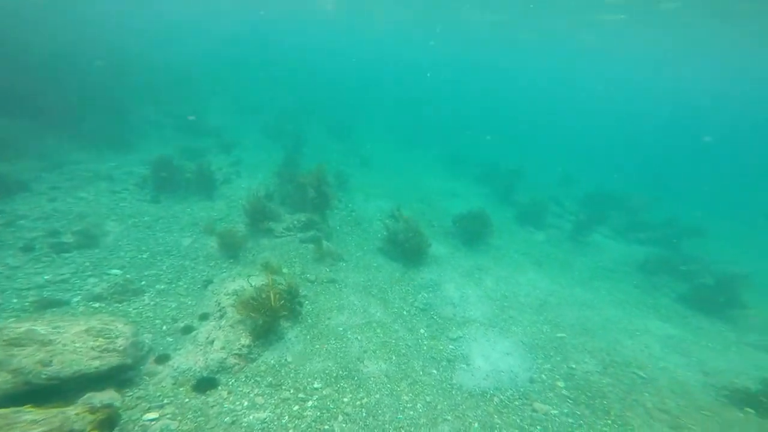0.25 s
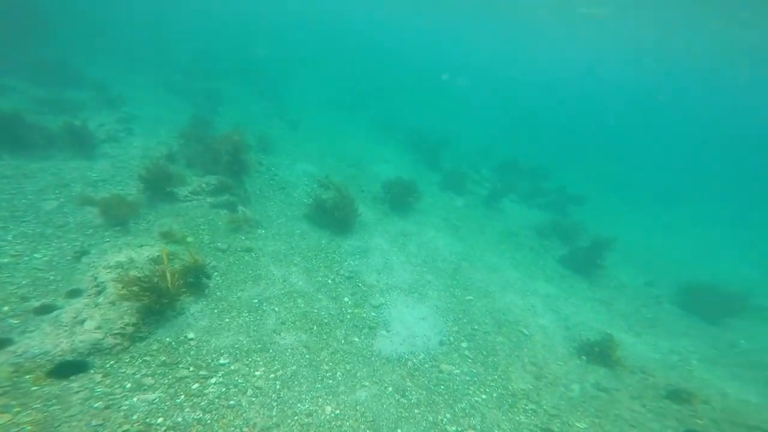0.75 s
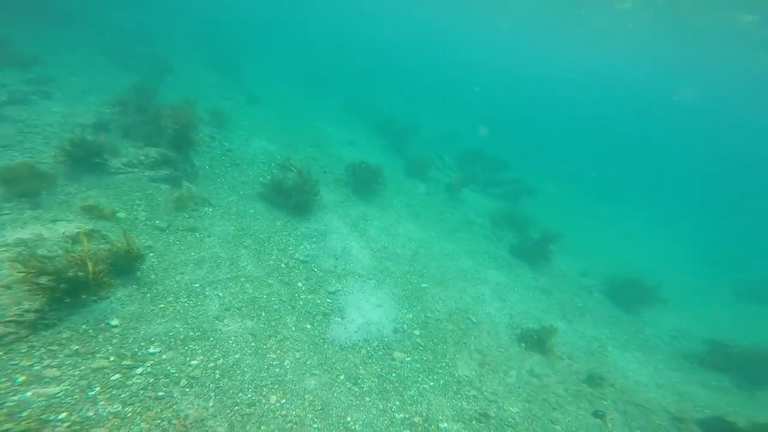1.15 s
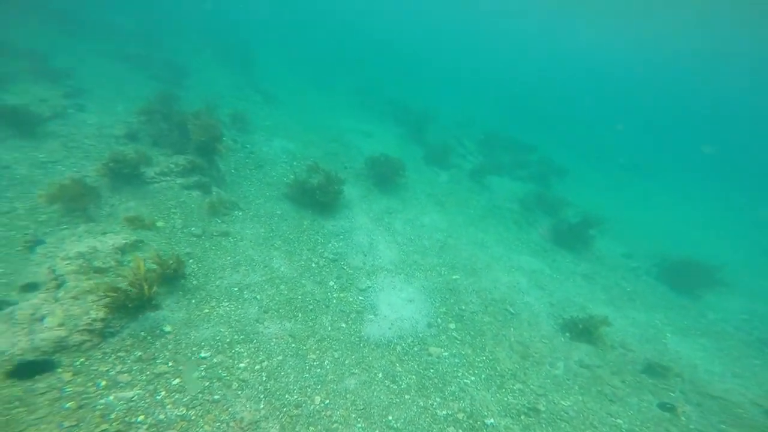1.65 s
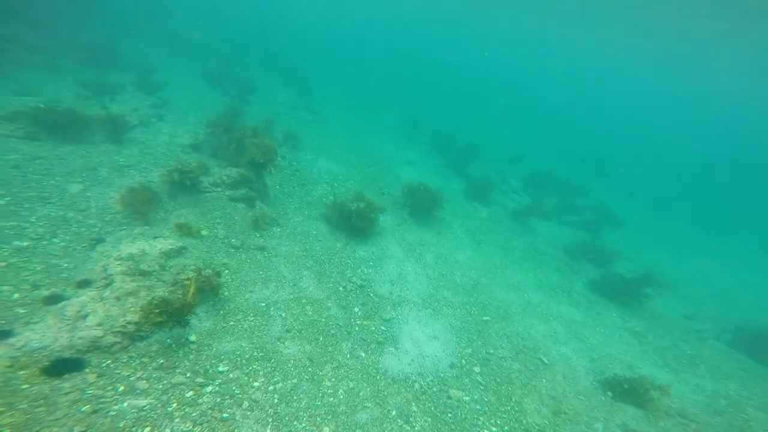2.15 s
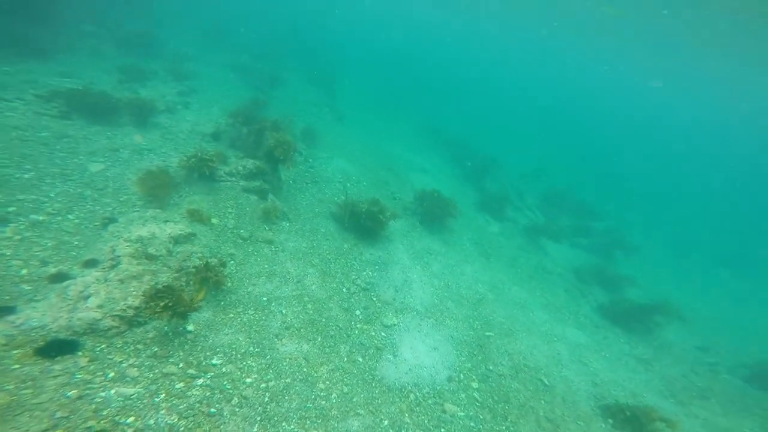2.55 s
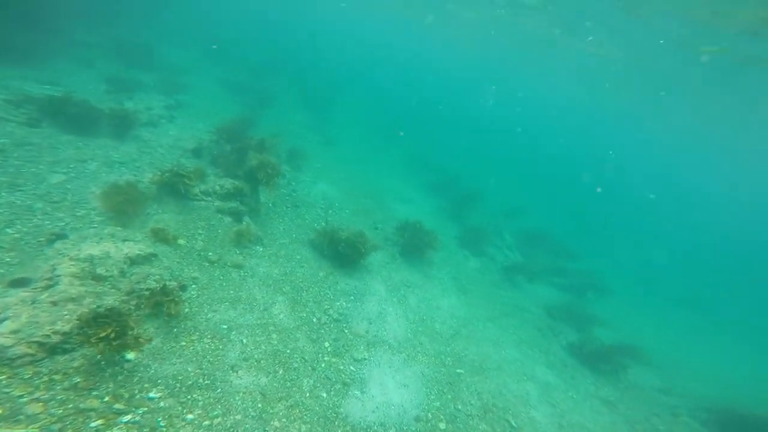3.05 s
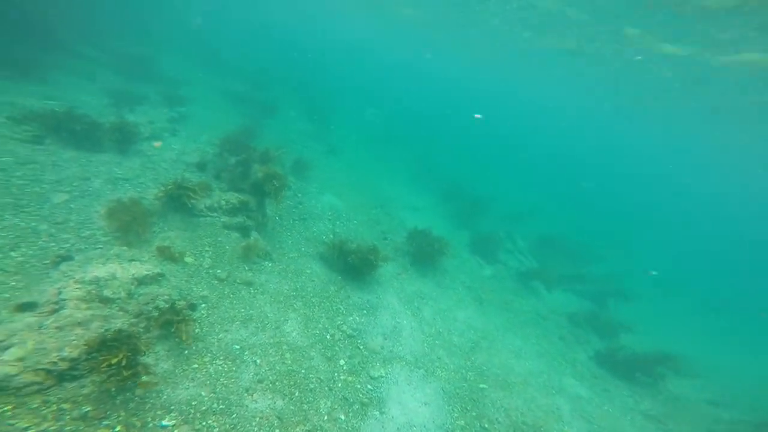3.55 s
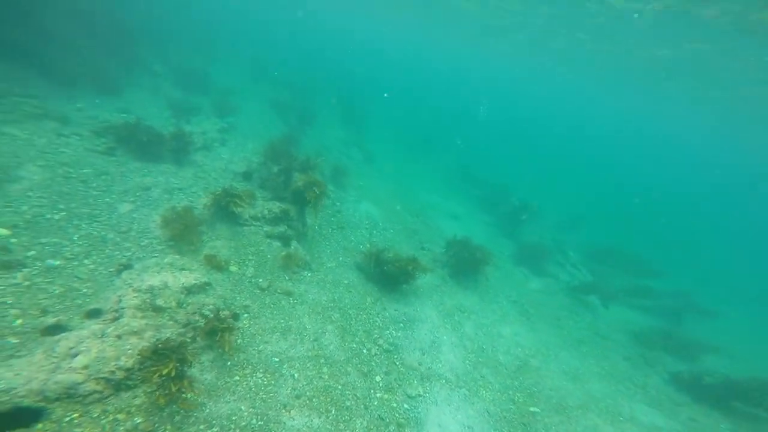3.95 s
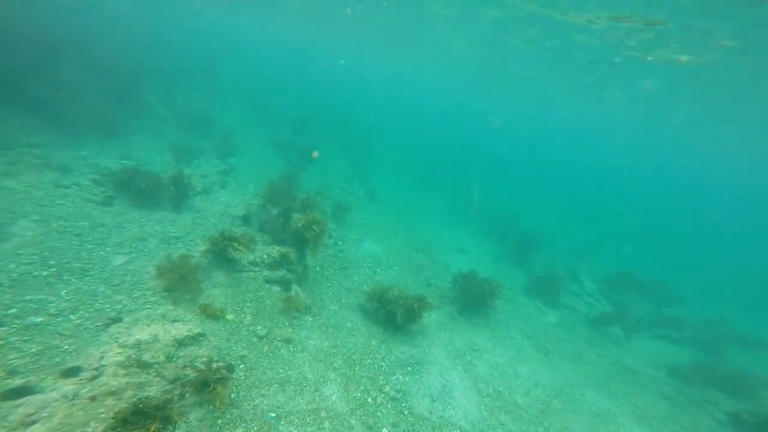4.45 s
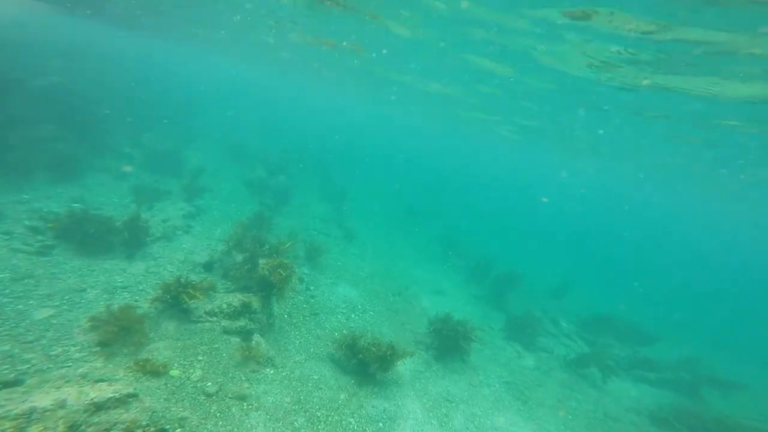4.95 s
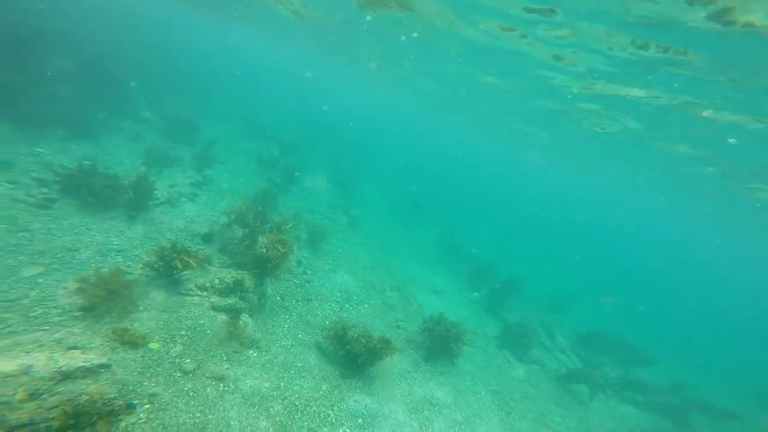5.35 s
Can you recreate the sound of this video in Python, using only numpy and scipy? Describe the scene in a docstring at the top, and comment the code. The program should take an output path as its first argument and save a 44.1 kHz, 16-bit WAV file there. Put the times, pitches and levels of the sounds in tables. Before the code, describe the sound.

A shallow seabed is heard from inside a sealed camera housing, muffled and boxy. Low surging rumble and dull water murmur waver throughout beneath distant crackle and tiny bubble fizz, with faint steady hiss and a very thin, rapidly fluttering high whine. Dry shrimp-like snaps come irregularly, several a second: strong ones at 0.05 and especially 0.25, a busy patch near 0.7, then sparser, weaker ticks. The wash and crackle swell around 1.7-2.2, with a hard snap at 1.8, then fall back by 2.3. Another sharp snap lands at 2.9. Soft low water thumps recur, as near 0.2, 1.6 and 4.2. Round hollow gulps cluster at 3.4-4.0, the clearest at 3.4. A blunt casing knock joins a loud snap at 4.07; a gulp, click and knock meet near 4.8, and snap and knock again at 5.4. Low surge rises at the end.

```python
"""Water murmurs and crackles on a sealed camera housing over faint hiss and whine, while shrimps snap
throughout. Water is coloured noise; far snaps and bubbles excite the wall's modes. Near snaps are a pulse plus
decaying scatter through those modes. Air pockets gulp as short sines, and a few low thumps hum the same way;
low lumps of water are brief sine pulses, and grit knocks as noise bursts in the low modes. The wall notches all
but the electronics."""
import sys
import numpy as np
from scipy import signal
from scipy.fft import rfft, irfft, next_fast_len
from scipy.io import wavfile
from scipy.ndimage import uniform_filter1d, map_coordinates

SR = 44100
rng = np.random.default_rng(int(sys.argv[2]) if len(sys.argv) > 2 else 0)


def store_pcm(level_fs):
    """Save levels as 16-bit WAV."""
    pcm = np.round(np.clip(level_fs, -1, 1) * 32767).astype(np.int16)
    wavfile.write(sys.argv[1], SR, np.atleast_2d(pcm).T)


N = 246959

# low housing resonances: centre_hz, width_hz, gain_db
HOLLOW_MODES = [(540, 95, 3.5), (676, 97, 7.5), (824, 80, -5), (930, 150, -3.5)]
# middle housing resonances: centre_hz, width_hz, gain_db
RING_MODES = [(1631, 64, 12.5), (1873, 150, 16), (2290, 405, 16), (3220, 1200, 12), (3870, 2700, 4),
              (4320, 360, -26)]
# upper housing resonances: centre_hz, width_hz, gain_db
TREBLE_MODES = [(5180, 2140, 7.5), (8500, 4400, 4)]


def amp(db):
    """Decibels to gain."""
    return 10 ** (np.asarray(db) / 20)


def unit(x):
    """Scaled to rms 1."""
    return x / np.sqrt(np.mean(x ** 2) + 1e-20)


def shape(points):
    """Gain curve through (Hz, dB) points on a log axis; -120 dB outside them."""
    point_hz, point_db = np.transpose(points)

    def gain(hz):
        return amp(np.interp(np.log(hz + 1), np.log(point_hz + 1), point_db, left=-120, right=-120))
    return gain


def peak(f, hz, width):
    """One causal resonance, gain 1 at its centre."""
    return 1j * f * width / (hz * hz - f * f + 1j * f * width)


def modes(table):
    """Resonances summed with like signs leave notches between; a window confines the group."""
    low_hz, high_hz = table[0][0], table[-1][0]
    centre_hz, width_hz = np.sqrt(low_hz * high_hz), 1.15 * high_hz - .85 * low_hz

    def response(f):
        total = sum(amp(db) * peak(f, hz, width) for hz, width, db in table)
        return peak(f, centre_hz, width_hz) ** 2 * total
    return response


def filtered(x, response):
    """x through a complex response of frequency."""
    n = x.shape[-1]
    m = next_fast_len(n + 8192)  # padding for the ringing
    spectrum = rfft(x, m) * response(np.fft.rfftfreq(m, 1 / SR))
    return irfft(spectrum, m)[..., :n]


def wobble(rate_hz):
    """A smooth random curve, rate_hz knots a second."""
    return map_coordinates(rng.standard_normal(700), [np.arange(N) * rate_hz / SR])


def noise(response, flutter_db, rate_hz):
    """Coloured noise of rms 1 whose level flutters."""
    source = amp(flutter_db * wobble(rate_hz)) * rng.standard_normal(N)
    return unit(filtered(source, response))


def add(track, s, sound):
    """Mixes a sound in at time s."""
    part = track[round(s * SR):][:len(sound)]
    part += sound[:len(part)]


def far_snaps(count, spread_db, t60_s):
    """Distant snaps at random times, most of them faint, each smeared by the stones."""
    when, size = rng.random((count, 2)).T
    hits = np.bincount((when * N).astype(int), amp(-spread_db * np.log(size + .004)), N)
    smear = amp(-60 * np.arange(2000) / SR / t60_s)
    return unit(signal.fftconvolve(hits, smear)[:N] * rng.standard_normal(N))


def pops(count, centre_hz, spread_db, cycles):
    """Clusters of tiny distant bubbles, each a few cycles at its own pitch."""
    when, near, size, tone, life = rng.random((count, 5)).T
    clusters = np.floor(when * 90) * .618 % 1  # ninety swarms spread over the whole time
    start = ((clusters * N + near ** 2 * 0.055 * SR) % N).astype(int)
    hz = centre_hz * 2 ** (1.473 * tone - .6)
    t = np.arange(700) / SR
    decay_per_s = hz / (cycles * (0.34 + life))
    onset = 1 - np.exp(-t / 0.00076)
    taper = np.cos(np.pi / 2 * t / t[-1])
    bubbles = np.sin(2 * np.pi * hz[:, None] * t) * np.exp(-decay_per_s[:, None] * t) * onset * taper
    bubbles *= amp(-spread_db * np.log(size + 0.013))[:, None]
    positions = start[:, None] + np.arange(700)
    return unit(np.bincount(positions.ravel(), bubbles.ravel(), N + 700)[:N])


def water():
    """Surge and murmur come through the walls; wash and far crackle excite the housing's resonances."""
    # water on the housing: start_s, surge_db, murmur_db, hollow_wash_db, crackle_db
    water_levels = [(0.0, -46, -56.5, -59.5, -58.5), (0.34, -53, -56.5, -58, -59),
                    (0.51, -49.5, -60.5, -60.5, -59), (0.78, -50.5, -61, -64.5, -62.5),
                    (1.08, -45, -63, -62, -60), (1.53, -48, -56.5, -59.5, -61),
                    (1.76, -41, -54.5, -52.5, -59), (1.95, -44.5, -57, -52.5, -55),
                    (2.12, -45.5, -56, -55, -53.5), (2.32, -53, -60, -65, -63.5),
                    (2.65, -45.5, -62, -59, -59), (2.84, -47.5, -63, -57.5, -65.5),
                    (3.17, -50, -54.5, -58, -57), (3.34, -50.5, -57, -56.5, -60),
                    (4.04, -49, -55.5, -53.5, -56.5), (4.15, -43, -57.5, -55, -59),
                    (4.82, -48.5, -64.5, -62, -60.5), (5.01, -49, -59.5, -59.5, -65.5),
                    (5.33, -53, -64.5, -65.5, -66.5), (5.6, -40.5, -58, -62.5, -63)]
    # low surge spectrum: freq_hz, density_db
    surge_spectrum = [(8.8, -4), (15, 9.5), (35, 2.5), (67, -6.5), (113, -25.5), (130, -27), (170, -78),
                      (290, -120)]
    # murmur spectrum: freq_hz, density_db
    murmur_spectrum = [(59, -26), (100, -5.5), (134, -0.5), (237, 0.5), (295, -5), (450, -6.5), (580, -46),
                       (990, -120)]
    s, *levels_db = np.transpose(water_levels)
    surge, murmur, hollow, crackle = (amp(np.interp(np.arange(N) / SR, s, db)) for db in levels_db)

    low = surge * noise(shape(surge_spectrum), flutter_db=0.9, rate_hz=15.0)
    low += murmur * noise(shape(murmur_spectrum), flutter_db=1.95, rate_hz=20)

    gurgle = unit(filtered(pops(count=500, centre_hz=619, spread_db=2.5, cycles=3.7), modes(HOLLOW_MODES)))
    wash = noise(modes(HOLLOW_MODES), flutter_db=2.7, rate_hz=30) + amp(-4) * gurgle

    steady = amp(1.26 * wobble(25.01)) * rng.standard_normal(N)
    dull = steady + 0.76 * far_snaps(count=600, spread_db=1.0, t60_s=0.012)
    fizz = pops(count=1800, centre_hz=2430, spread_db=2.0, cycles=6.3)
    bright = far_snaps(count=400, spread_db=8.5, t60_s=.012)
    far = unit(filtered(dull, lambda f: modes(RING_MODES)(f) * peak(f, 1340, 1020)))
    far += amp(-4) * unit(filtered(fizz, modes(RING_MODES)))
    far += amp(-26.0) * unit(filtered(bright, modes(TREBLE_MODES)))
    return low + hollow * unit(wash) + crackle * unit(far)


def electronics():
    """Amplifier hiss, and a thin whine whose sign flips to and fro; its octave pulses without flipping."""
    # hiss spectrum: freq_hz, density_db
    hiss_spectrum = [(300, -45), (900, -11), (1300, 2), (1700, -10), (3000, 2.5), (5000, -2.5),
                     (6300, -1.5), (7300, -5), (9000, -4.5), (11000, -10), (13800, -7.5), (16400, -14)]
    line_hz, flip_hz = 6308.65, 15.08  # the sensor's whine; full cycles of its sign
    t = np.arange(N) / SR
    turn = np.tanh(6 * np.sin(2 * np.pi * flip_hz * t))
    whine = amp(-68.0 + 0.46 * wobble(8.2)) * turn * np.sin(2 * np.pi * line_hz * t)
    pulsing = 1 + .25 * np.sin(4 * np.pi * flip_hz * t)
    octave = amp(-72.5) * pulsing * np.sin(4 * np.pi * line_hz * t)
    hiss = amp(-65.5) * noise(shape(hiss_spectrum), flutter_db=0.59, rate_hz=24)
    return hiss + whine + octave


def snaps():
    """A claw's bubble collapses: a sharp front, then scatter from the seabed; treble dies first."""
    # snaps and ticks: start_s, level_db, centre_hz, treble_db, treble_hz, air_db, t60_s
    snap_events = [(0.0471, -13.5, 2850, -17, 5280, -20, 0.014), (0.1511, -26, 2770, -20, 5240, -31, 0.012),
                   (0.183, -48, 2310, -16, 6280, 6, .029), (0.2334, -30, 2340, -26, 6300, -21, 0.045),
                   (0.2509, -9, 2400, -24.5, 6040, -22, 0.028), (0.378, -43, 2250, -10, 6300, -13, .025),
                   (0.4622, -27.5, 2880, -35, 6600, -38, 0.031), (0.4744, -34, 2480, -23, 6300, -25, 0.039),
                   (0.5144, -40.5, 2450, -21, 6300, -26, .032), (0.566, -34, 3140, -16, 6300, -31, 0.035),
                   (0.659, -24, 2600, -15.5, 5260, -23, 0.013),
                   (0.6782, -25.5, 2220, -37, 6300, -40, 0.039), (0.7187, -30, 3700, -21, 6300, -23, 0.025),
                   (0.7238, -21, 2320, -7, 5200, -15.5, 0.066), (0.7495, -32, 3320, -29, 6300, -27, .028),
                   (0.907, -33.5, 2240, -25, 6300, -28, 0.044), (0.919, -36.5, 2100, -29, 6300, -28, 0.013),
                   (0.949, -34, 3130, -14, 6300, -29, 0.041), (1.015, -40.5, 2000, -14, 6300, -20, 0.037),
                   (1.0383, -34.5, 2400, -8, 5900, -25, 0.043), (1.17, -40, 4120, -23, 6300, -28, 0.011),
                   (1.1942, -36.5, 1800, -19, 6300, -30, 0.045), (1.256, -35, 2400, -18, 6300, -32, 0.024),
                   (1.3174, -31, 2550, -20, 6890, -21, .025), (1.3627, -24, 1600, -19, 6300, -35, 0.096),
                   (1.431, -33.5, 3100, -4.5, 5320, -15, 0.015), (1.508, -42.5, 2330, -4, 6790, -5, 0.023),
                   (1.5448, -37.5, 2280, -26, 6300, -30, 0.017),
                   (1.641, -33.5, 2300, -1.5, 8100, -7, 0.012),
                   (1.6637, -22.5, 2470, -29, 7200, -21, 0.014),
                   (1.8156, -14, 2400, -18.5, 7660, -38, 0.0088),
                   (1.8715, -23, 2370, -18, 5330, -24, 0.086), (1.9222, -26.5, 1810, -32, 6300, -29, 0.095),
                   (1.9808, -47.5, 2540, -12, 6300, 6, 0.015), (2.0092, -44, 3170, -22, 6300, -26, .031),
                   (2.0821, -26.5, 3370, -5, 5200, -12, 0.036), (2.382, -34, 2320, -18, 6300, -29, 0.034),
                   (2.5293, -33.5, 2980, -10, 5370, -37, 0.0097),
                   (2.5602, -22, 2070, -11, 6600, -25, 0.044), (2.639, -24.5, 2180, -21, 6300, -27, 0.094),
                   (2.8213, -36.5, 2300, -25, 6300, -34, 0.034),
                   (2.8743, -17.5, 2400, -23, 5260, -25, 0.011),
                   (2.9634, -34.5, 2490, -8.5, 7540, -22, 0.011),
                   (3.1425, -26.5, 3270, -9, 5370, -37, 0.016), (3.236, -26.5, 2440, -32, 6300, -24, 0.072),
                   (3.268, -26, 2330, -32, 6300, -31, 0.053), (3.496, -41, 2200, -5.5, 6400, -7, 0.01),
                   (3.5293, -41.5, 2430, -5, 6300, -22, 0.019), (3.6374, -35, 1850, -29, 6300, -27, .034),
                   (3.7912, -32, 2600, -28, 6300, -28, 0.041), (3.8197, -30, 2840, -30, 6300, -27, 0.048),
                   (3.882, -34.5, 2360, -16, 6300, -25, 0.044), (4.0195, -26, 2560, -17, 6630, -21, 0.11),
                   (4.059, -27, 2130, -23, 6150, -39, 0.097), (4.072, -17.5, 1890, -17.5, 5850, -52, 0.035),
                   (4.18, -45, 2930, -6, 6300, -25, .025), (4.2452, -29.5, 2560, -11.5, 6200, -28, 0.051),
                   (4.313, -28.5, 3500, -27, 6300, -22, 0.034), (4.452, -42.5, 1880, -22, 6300, -28, 0.013),
                   (4.4867, -39, 2300, -23, 6300, -28, 0.022), (4.5443, -42, 3380, -7, 6300, -7, 0.033),
                   (4.588, -38.5, 2610, -10, 6300, -12, 0.043),
                   (4.7912, -21, 2700, -15.5, 7300, -21, 0.053), (4.817, -36, 3410, -22, 6300, -17, .025),
                   (4.905, -39.5, 2490, -24, 6300, -26, .029), (4.956, -39, 2340, -25, 6300, -29, 0.035),
                   (4.964, -31.5, 2270, -22, 6300, -27, 0.07), (5.039, -38, 2290, 1.5, 7960, 2, 0.023),
                   (5.0654, -29.5, 2650, -32, 6300, -27, 0.053),
                   (5.203, -34.5, 3050, -28, 6300, -29, 0.054), (5.221, -46, 2600, -18, 6300, -29, 0.027),
                   (5.311, -43, 3540, -12, 6300, 6, 0.025), (5.3314, -25.5, 2320, -8.5, 6040, -17, 0.086),
                   (5.4073, -36, 2200, -28, 6200, -40, 0.0072),
                   (5.4106, -19.5, 2190, -13, 5770, -46, 0.018), (5.4902, -29, 2440, -13, 5230, -23, 0.023)]
    # topmost resonances: centre_hz, width_hz, gain_db
    air_modes = [(9000, 5200, -7), (13700, 2000, -8.5)]
    focus, front_db, rise_s = 1.53, 12, 0.00022  # focus: how tightly a snap picks its modes
    out, t = np.zeros(N), np.arange(4096) / SR
    for s, db, hz, treble_db, treble_hz, air_db, t60_s in snap_events:
        chance = rng.standard_normal((4, len(t))) * (1 - np.exp(-(t + 1 / SR) / rise_s))
        chance[:, 24] += amp(front_db)  # the direct pulse
        scatter = amp(-60 * t / t60_s) + amp(-33 - 60 * t / 0.24)  # plus a long faint tail
        # size and distance set which modes speak
        body = lambda f: modes(RING_MODES)(f) * peak(f, hz, 2220) ** focus
        shine = lambda f: modes(TREBLE_MODES)(f) * peak(f, treble_hz, 1500)
        bands = [(body, 0, scatter), (shine, treble_db, scatter ** 1.32),
                 (modes(air_modes), air_db, scatter ** 1.7), (modes(HOLLOW_MODES), -30, scatter)]
        snap = sum(amp(band_db) * unit(filtered(source * fade, colour))
                   for source, (colour, band_db, fade) in zip(chance, bands))
        # a shorter snap packs its energy tighter
        add(out, s, amp(db - 25) * unit(snap) / np.sqrt(t60_s / 0.038))
    return out


def gulps():
    """Trapped air rings a few cycles, soft at the start, its pitch slightly unsteady; a few low thumps near 150
    Hz hum the same way."""
    # air pockets, and a few low thumps humming near 140-190 Hz: start_s, level_db, pitch_hz, t60_s
    gulp_events = [(0.12, -47, 696, .089), (0.216, -28.5, 620, 0.025), (0.235, -39.5, 660, 0.047),
                   (0.412, -48, 526, 0.041), (1.106, -47.5, 695, .039), (1.232, -42, 684, 0.027),
                   (1.78, -44, 776, 0.077), (2.341, -48, 428, 0.12), (2.612, -46, 590, .11),
                   (2.792, -42, 588, 0.049), (2.813, -39.5, 425, 0.085), (2.824, -43.5, 508, .062),
                   (3.354, -47, 665, .15), (3.388, -43, 545, .11), (3.426, -32.5, 662, 0.127),
                   (3.449, -54, 655, 0.026), (3.525, -42.5, 689, .085), (3.539, -48, 191, .12),
                   (3.557, -43.5, 680, 0.068), (3.639, -44, 687, 0.065), (3.689, -47, 665, 0.028),
                   (3.707, -50, 143, .19), (3.846, -44.5, 156, 0.16), (3.89, -42.5, 154, .1),
                   (3.947, -40, 652, .06), (3.998, -46, 2150, 0.035), (4.013, -45, 652, 0.054),
                   (4.123, -43, 677, 0.025), (4.4154, -52.5, 5440, .018), (4.6714, -36.5, 2360, 0.017),
                   (4.773, -45, 710, .078), (4.787, -32.5, 666, .042), (4.963, -52, 643, 0.027),
                   (5.008, -53, 5260, .016), (5.3911, -45, 2110, 0.027)]
    out, t = np.zeros(N), np.arange(6000) / SR
    for s, db, hz, t60_s in gulp_events:
        rise_s = 0.0589 * t60_s
        swell = (1 - np.exp(-t / rise_s)) ** 2 * amp(-60 * t / t60_s)
        waver_hz = 25 * unit(uniform_filter1d(rng.standard_normal(len(t)), size=400))
        tone = np.sin(2 * np.pi * np.cumsum(hz + waver_hz) / SR)
        add(out, s - rise_s, amp(db) * tone * swell / swell.max())
    return out


def lumps():
    """Water pushes on the port: a pull, a push and a rebound of the membrane."""
    # pushes: centre_s, level_db, pitch_hz
    lump_events = [(0.203, -34.5, 53), (0.388, -33, 70), (1.177, -32.5, 86), (1.576, -30, 56),
                   (1.699, -34, 75), (1.792, -49, 70), (1.852, -38.5, 47.7), (2.493, -44, 47.4),
                   (2.624, -44, 41.6), (2.81, -45, 59), (2.955, -35, 74), (2.991, -39, 70),
                   (3.317, -34.5, 63), (3.596, -37.5, 48), (3.942, -40, 74), (4.238, -33, 66),
                   (4.354, -43, 53), (4.444, -43, 53.7), (4.642, -44, 59), (4.758, -36, 59),
                   (5.528, -39.5, 65)]
    half_cycles, onset_share = 0.53, 0.34  # half length in cycles of the pitch; shorter onset
    out, t = np.zeros(N), np.arange(-2205, 2205) / SR
    for s, db, hz in lump_events:
        half_s = half_cycles / hz * np.where(t < 0, onset_share, 1)
        add(out, s + t[0], amp(db) * np.sin(2 * np.pi * hz * t) * np.exp(-(t / half_s) ** 2))
    return out


def knocks():
    """A blunt, scraping blow wakes the low modes of the housing, most those near the spot it hits."""
    # drifting grit: start_s, level_db, hollow_hz, thud_db, ring_db, t60_s
    knock_events = [(0.463, -42.5, 690, -8, 4, 0.02), (0.675, -40, 740, -2.5, -1, 0.076),
                    (1.012, -40, 700, -1, -6, 0.036), (1.362, -37.5, 700, -13, -1.5, 0.033),
                    (3.798, -36.5, 680, -38, -4, 0.0086), (4.071, -24, 890, -7, 5.5, .04),
                    (4.239, -50, 840, 3.5, 1, 0.024), (4.787, -33.5, 630, -4, -30, 0.008),
                    (4.794, -35, 716, -11, -5, 0.026), (5.204, -43.5, 950, -10, -1, 0.037),
                    (5.411, -27, 800, -16, 2, 0.021), (5.417, -37.5, 710, -19, -2, 0.083),
                    (5.49, -38, 665, -22, -13, 0.012)]
    # lowest resonances: centre_hz, width_hz, gain_db
    thud_modes = [(162, 22, 3), (249, 140, -13), (326, 420, -14)]
    rise_s, ring_lag_s, ring_over_hollow = 0.00193, 0.00306, 1.87  # last: pitch ratio of mode groups
    out, t = np.zeros(N), np.arange(8192) / SR
    for s, db, hz, thud_db, ring_db, t60_s in knock_events:
        blow = (1 - np.exp(-t / rise_s)) * amp(-60 * t / t60_s)
        hollow = lambda f: modes(HOLLOW_MODES)(f) * peak(f, hz, 280)
        lag = lambda f: np.exp(-2j * np.pi * f * ring_lag_s)
        ring = lambda f: modes(RING_MODES[:3])(f) * peak(f, ring_over_hollow * hz, 480) * lag(f)
        bands = [(modes(thud_modes), thud_db), (hollow, 0), (ring, ring_db)]
        knock = sum(amp(band_db) * unit(filtered(blow * rng.standard_normal(len(t)), colour))
                    for colour, band_db in bands)
        add(out, s - rise_s, amp(db - 18.5) * knock)
    return out


def scene():
    """All the sea sounds pass through the housing wall, whose cancellations notch them."""
    # cancellations in the wall: centre_hz, width_hz, depth (0-1)
    wall_dips = [(1200, 300, .55), (1705, 110, .9), (2850, 200, .6), (3800, 150, .6), (4780, 200, .6)]
    sea = water() + snaps() + gulps() + lumps() + knocks()

    def wall(f):
        return np.prod([1 - depth * peak(f, hz, width) for hz, width, depth in wall_dips], axis=0)
    return filtered(sea, wall)[None]


def record(dry):
    """The camera adds its own noise, fades at the top and keeps nothing above its band limit."""
    # the camera's top end: freq_hz, gain_db
    top_fade = [(1, 0), (15150, 0), (15350, -9), (16600, -21)]
    top_hz = 16600
    return filtered(dry + electronics(), lambda hz: shape(top_fade)(hz) * (hz < top_hz))


dry = scene()
out = record(dry)
store_pcm(out)
```